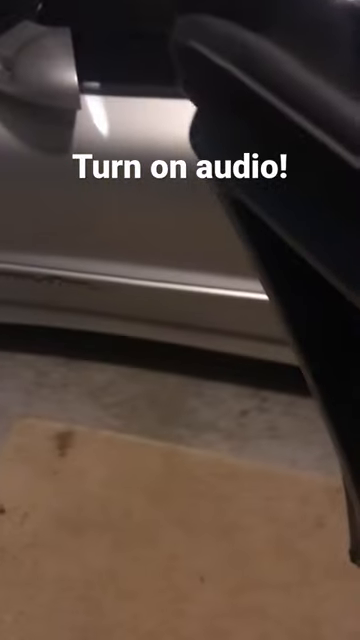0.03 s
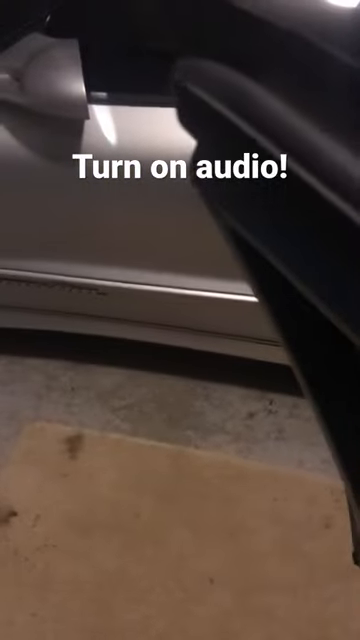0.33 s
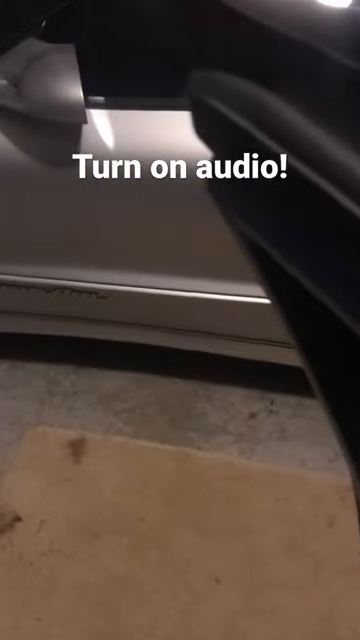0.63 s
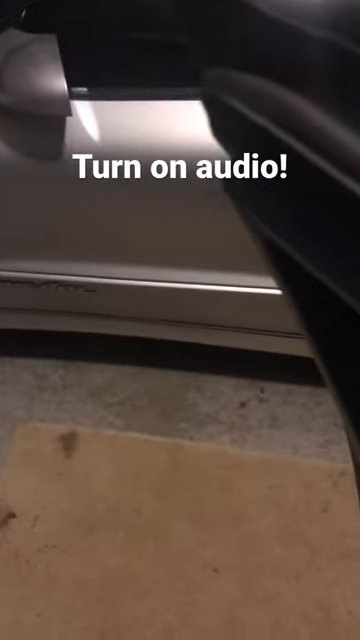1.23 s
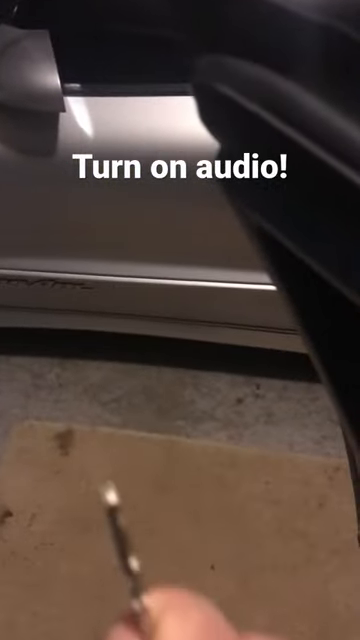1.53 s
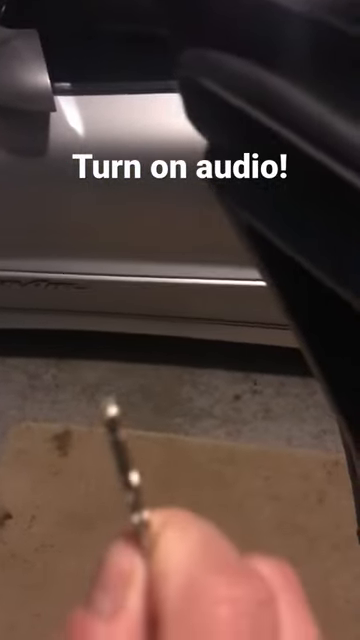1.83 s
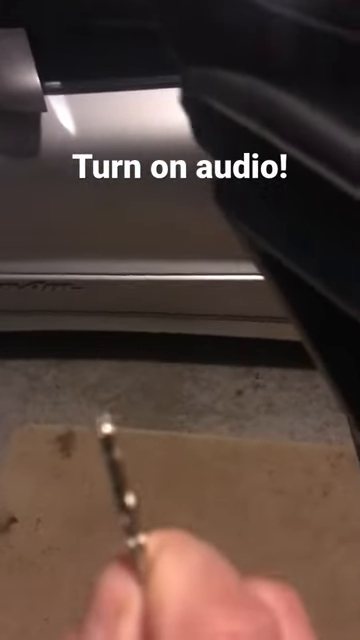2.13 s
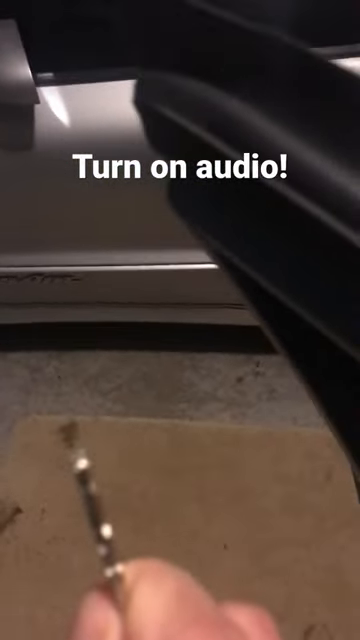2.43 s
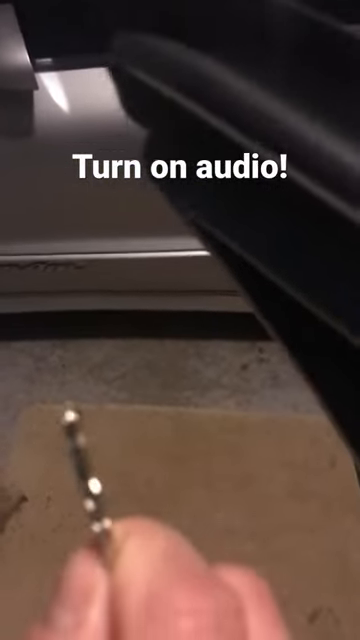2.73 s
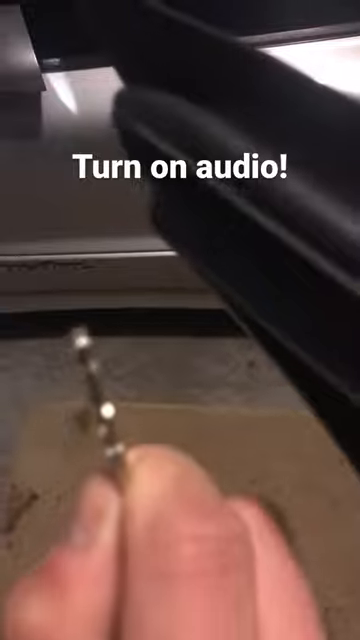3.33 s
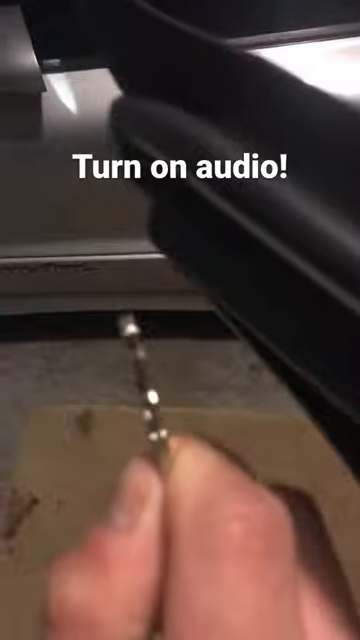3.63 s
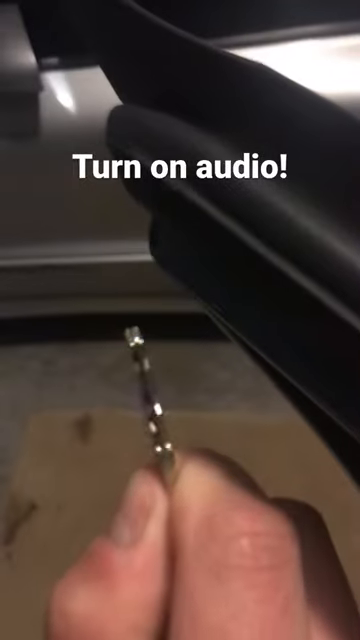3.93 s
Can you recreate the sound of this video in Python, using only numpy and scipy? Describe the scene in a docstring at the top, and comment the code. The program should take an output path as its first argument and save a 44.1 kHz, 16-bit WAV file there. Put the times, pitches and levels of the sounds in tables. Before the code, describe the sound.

Static electricity snaps sharply after faint handling noises, followed by a loud, thumping crack.

```python
"""A static spark snaps from a metal tip close to the microphone and leaves a raised hiss.
A second, louder crack overloads the microphone, which swings in a deep, falling thump.
The place is a quiet garage with a short echo. Before the spark, a hand shifts beside an open
car door: faint rustles, ticks and clinks, and one soft bump that rings the door panel."""
import sys
import numpy as np
from scipy import signal
from scipy.fft import rfft, irfft
from scipy.io import wavfile

SR = 44100
rng = np.random.default_rng(int(sys.argv[2]) if len(sys.argv) > 2 else 0)


def transcribe(signal):
    """Save signal, clipped to [-1, 1], as a 16-bit WAV file at the path in sys.argv[1]."""
    frames = np.atleast_2d(signal).T
    limited = np.clip(frames, -1, 1)
    pcm = np.round(limited * 32767).astype(np.int16)
    wavfile.write(sys.argv[1], SR, pcm)


N = 176400
SPARK_S = 3.5861


def amp(db):
    """Decibels to gain."""
    return 10 ** (np.asarray(db) / 20)


def unit(x):
    """Scale to rms 1."""
    return x / np.sqrt(np.mean(x ** 2) + 1e-20)


def since(s):
    """Seconds since s, zero before it."""
    return np.maximum(np.arange(N) / SR - s, 0)


def colour(points):
    """Gain against frequency from (Hz, dB) points."""
    f, db = np.transpose(points)
    return lambda hz: amp(np.interp(np.log(hz + 1), np.log(f + 1), db))


def band(centre_hz, octaves):
    """A bell-shaped gain on the octave scale."""
    return lambda hz: np.exp(-.5 * (np.log2((hz + 1) / centre_hz) / octaves) ** 2)


def bells(rows, hz):
    """The summed dB of (centre Hz, width Hz, dB) peaks and dips."""
    return sum(db / (1 + (2 * (hz - centre) / width) ** 2) for centre, width, db in rows)


def filtered(x, gain):
    """x through a gain of frequency."""
    return irfft(rfft(x, 2 * N) * gain(np.fft.rfftfreq(2 * N, 1 / SR)))[:N]


def noise(gain):
    """Coloured noise of rms 1."""
    white = rfft(rng.standard_normal(N))
    return unit(irfft(white * gain(np.fft.rfftfreq(N, 1 / SR)), N))


def decay(s, t60, attack_s):
    """A rise at s and an exponential fall of 60 dB in t60 seconds."""
    t = since(s)
    return (1 - np.exp(-t / attack_s)) * np.exp(-np.log(1000) * t / t60)


def ring(s, modes, attack_s):
    """Damped modes struck at s."""
    return sum(amp(db) * decay(s, t60, attack_s) * np.sin(2 * np.pi * hz * since(s))
               for hz, db, t60 in modes)


def pulse(gain, size=4096):
    """A minimum-phase click of peak 1 with the given colour."""
    cepstrum = irfft(np.log(gain(np.fft.rfftfreq(size, 1 / SR))))
    cepstrum[1:size // 2] *= 2
    cepstrum[size // 2 + 1:] = 0
    click = irfft(np.exp(rfft(cepstrum)))
    return click / np.abs(click).max()


def garage():
    """The garage's steady room tone, and the hiss that stays up after the spark."""
    # Spectra of room tone and hiss. Each row: frequency in Hz, relative level in dB.
    room_tone = [(13, -51), (22, -30), (40, -7.5), (64, -0.5), (115, -9), (180, -12.5), (300, -14),
                 (454, -18), (667, -19), (1220, -23), (3290, -28.5), (10500, -34.5), (12700, -34),
                 (15800, -35)]
    hiss_colour = [(59, -35), (100, 0), (307, -7), (349, -5.5), (659, -9), (800, -11.5), (2000, -14.5),
                   (3400, -11), (5800, -14.5), (9000, -17), (12700, -18), (15800, -22)]
    # The hiss creeps up. Each row: time in seconds, level in dB.
    hiss_level = [(3.59, -65.5), (3.7, -63), (3.92, -62)]
    s, db = np.transpose(hiss_level)
    hiss_gain = amp(np.interp(np.arange(N) / SR, s, db)) * (since(SPARK_S) > 0)
    return amp(-66) * noise(colour(room_tone)) + hiss_gain * noise(colour(hiss_colour))


def rustles():
    """Hand and cloth brush in soft swells of noise."""
    # Each row: crest, rise and fall in seconds, level in dB, centre in Hz, width in octaves.
    brushes = [(.2, 0.091, 0.18, -66, 83.5, 0.25), (1.12, 0.14, 0.073, -68, 2830, 0.99),
               (1.631, .025, 0.043, -62, 89, 0.87), (2.11, 0.076, 0.051, -61.5, 1280, 1.34),
               (2.128, 0.024, 0.035, -60.5, 282, 0.58), (2.27, 0.17, 0.18, -63.5, 149, 1.1),
               (2.27, 0.22, 0.14, -71.5, 8500, 0.81), (2.38, 0.23, 0.31, -66.5, 760, 1.84),
               (2.62, 0.09, .07, -71, 10800, 0.59), (2.68, 0.094, 0.079, -67, 4000, 0.93)]
    t, out = np.arange(N) / SR, np.zeros(N)
    for s, rise, fall, db, hz, octaves in brushes:
        swell = np.exp(-np.where(t < s, (s - t) / rise, (t - s) / fall))
        out += amp(db) * swell * noise(band(hz, octaves))
    return out


def handling():
    """The hand makes sharp little clicks, each with a noisy tail, and dull taps on the door."""
    # Each row: start in seconds, peak in dB, centre in Hz.
    clicks = [(0.4977, -50, 3900), (1.092, -50, 4500), (1.107, -53, 4500), (1.12, -51, 6000),
              (1.1418, -45.5, 2780), (1.15, -52, 8000), (1.419, -50.5, 3400), (1.5288, -52.5, 3700)]
    # Each row: start in seconds, level in dB, centre in Hz, t60 in seconds.
    taps = [(2.475, -53.5, 975, 0.027), (2.593, -47, 1240, .012), (2.610, -49, 1400, 0.021),
            (2.6233, -47.5, 1300, .024)]
    out = np.zeros(N)
    for s, db, hz in clicks:
        tone = band(hz, octaves=.85)
        snap = pulse(lambda f: tone(f) + .012)
        out[round(s * SR):][:len(snap)] += amp(db) * snap
        out += amp(db - 10) * decay(s, t60=.012, attack_s=.00024) * noise(tone)
    for s, db, hz, t60 in taps:
        out += amp(db) * decay(s, t60, attack_s=.00042) * noise(band(hz, octaves=.57))
    return out


def clinks():
    """Light metal ticks on contact and rings in a few high modes."""
    # Each row: start in seconds, level in dB, brightness in dB per octave.
    strikes = [(.079, -66.5, -6), (.154, -74, 9), (.72, -72.5, 8)]
    # The metal's modes. Each row: frequency in Hz, relative level in dB, t60 in seconds.
    metal = [(6740, -2.5, .52), (10850, -10, .16), (14305, -1, .12), (15355, -11, .16)]
    out = np.zeros(N)
    for s, db, tilt in strikes:
        modes = [(hz, level + tilt * np.log2(hz / metal[0][0]), t60) for hz, level, t60 in metal]
        contact = amp(14) * decay(s, t60=.012, attack_s=.00045) * noise(band(14500, octaves=.81))
        out += amp(db) * (ring(s, modes, attack_s=.00077) + contact)
    return out


def door_bump(start_s=2.6272):
    """A soft blow on the car door, whose panel rings low and rumbles on."""
    # Spectra of blow and rumble. Each row: frequency in Hz, relative level in dB.
    blow_colour = [(35, -35), (60, -2), (290, -0.5), (559, -11), (932, 1.5), (1500, -12), (2200, -19),
                   (2760, -25), (6390, -23), (8000, -34), (10400, -60), (17600, -120)]
    panel_colour = [(15, -40), (25, -13), (55, 1), (81, -15), (133, -10.5), (160, -14), (271, -10),
                    (504, -23.5), (850, -15.5), (1950, -29), (6000, -41.5), (7800, -66), (13200, -120)]
    # Each row: frequency in Hz, level in dB, t60 in seconds.
    panel_modes = [(53.3, -51.5, 0.75), (228.4, -48.5, 0.333), (272, -43, 0.094), (683, -56.5, .14),
                   (917, -38, 0.026), (1353, -50, .06)]
    blow = amp(-37) * decay(start_s, t60=.031, attack_s=.001) * noise(colour(blow_colour))
    rumble = amp(-49.5) * decay(start_s, t60=.75, attack_s=.0089) * noise(colour(panel_colour))
    return blow + rumble + ring(start_s, panel_modes, attack_s=.0018)


def flutter(crack_s, lead_s=.018):
    """Low tones and a rush of noise swell in just ahead of the crack and stop on it."""
    # Each row: frequency in Hz, level at the crack in dB, growth in dB per second.
    partials = [(394, -16, 800), (497, -13.5, 2198), (240, -23, 2200), (3130, -34.5, 1100)]
    ahead = np.maximum(crack_s - np.arange(N) / SR, 0)
    tones = sum(amp(db - growth * ahead) * np.sin(2 * np.pi * hz * ahead) for hz, db, growth in partials)
    rush = amp(-27 - 1500 * ahead) * noise(band(445, octaves=.92))
    return (ahead > 0) * (tones + rush) / (1 + (ahead / lead_s) ** 8)


def microphone_thump(start_s):
    """The overloaded microphone swings, sinking in pitch, rough at the height of the swing."""
    floor_hz, drop_hz, sag_s = 28, 1500, .00045
    attack_s, hold_s, t60 = .0015, .0172, .062
    t = since(start_s)
    pitch = (floor_hz + drop_hz * (1 + t / sag_s) ** -1.13) * (t > 0)
    swing = (1 - np.exp(-t / attack_s)) * np.exp(-np.log(1000) * since(start_s + hold_s) / t60)
    thump = amp(-.5) * swing * np.sin(2 * np.pi * np.cumsum(pitch) / SR)
    rattle = amp(-30) * swing ** 2 * noise(band(480, octaves=.55))
    return thump + rattle


def loud_crack():
    """Two ticks and a flutter lead into a hard crack; the microphone thumps and the garage echoes."""
    # Two ticks, then the crack. Each row: start in seconds, peak in dB before clipping.
    hits = [(3.9255, -23), (3.937, -29), (3.9484, 2.5)]
    # Spectra of crack and echo. Each row: frequency in Hz, relative level in dB.
    crack_colour = [(100, -38), (550, 6.5), (750, -1.5), (1000, 4), (2000, -2), (3800, -3.5), (4900, -6.5),
                    (6200, -6), (8800, -13.5), (9800, -30), (12500, -18.5), (16000, -33)]
    echo_colour = [(1000, -15), (4800, -6.5), (6400, -1.5), (9000, -1.5), (10400, -1), (11200, 2),
                   (13000, 0.5), (15700, -1)]
    impulses = np.zeros(N)
    for s, db in hits:
        impulses[round(s * SR)] -= amp(db)
    cracks = signal.fftconvolve(impulses, pulse(colour(crack_colour)))[:N]
    crack_s = hits[-1][0]
    echo = amp(-38) * decay(crack_s, t60=.3, attack_s=.0039) * noise(colour(echo_colour))
    return cracks - flutter(crack_s) + microphone_thump(crack_s) + echo


def gap_colour(points, share):
    """A colour shaped by a share of the resonances of metal and microphone near the spark gap."""
    # Resonances and a null. Each row: centre in Hz, width in Hz, lift in dB at full share.
    resonances = [(5630, 360, 9), (6540, 320, 8), (7800, 300, 4), (8840, 520, 11.5), (9470, 490, 12),
                  (11000, 440, 3), (12600, 700, 6.5), (13820, 350, 8), (14400, 300, -9), (15150, 500, 8)]
    return lambda hz: colour(points)(hz) * amp(share * bells(resonances, hz))


def spark(hold_s=.0011, scatter_s=.0032):
    """A millisecond shock and weaker scatter off hand and door ring nearby metal; the garage echoes."""
    # Spectra of shock and echo. Each row: frequency in Hz, relative level in dB.
    shock_colour = [(100, -18), (500, -12), (900, -23.5), (1150, -9), (1800, -7.5), (2250, -14.5),
                    (2650, -30), (3000, -10.5), (3700, -7), (5000, -11.5), (8200, -8), (10000, -8),
                    (11200, -2.5), (14400, -7), (16000, -5)]
    echo_colour = [(300, -10), (1400, 0.5), (2600, -5), (3800, -1), (4800, -7), (5700, -2.5), (6500, -7),
                   (8000, -6), (10200, -6), (11200, 2), (13000, -2), (15500, 4)]
    # First reflections. Each row: delay in seconds, level in dB against the direct sound.
    walls = [(.0093, -33), (0.024, -33.5)]
    t = since(SPARK_S)
    shape = (t > 0) * np.where(t < hold_s, 1, amp(-8) * (t < scatter_s))
    burst = shape * rng.standard_normal(N)
    burst[np.argmax(t > 0)] += amp(13)  # the shock front stands above what follows
    for _ in range(4):  # a shock carries all frequencies evenly
        spectrum = rfft(burst)
        burst = irfft(spectrum / (np.abs(spectrum) + 1e-12), N) * np.sqrt(shape)
    ringing = signal.fftconvolve(burst, pulse(gap_colour(shock_colour, share=1)))[:N]
    shock = unit(ringing) * np.sqrt(np.mean(shape ** 2))
    reflections = sum(amp(db) * np.roll(shock, round(delay * SR)) for delay, db in walls)
    echo = amp(-47) * decay(SPARK_S, t60=.29, attack_s=.0022) * noise(gap_colour(echo_colour, share=.85))
    return amp(-15) * (shock + reflections) + echo


def scene():
    """The garage from one microphone, close to the metal tip."""
    return (garage() + rustles() + handling() + clinks() + door_bump() + spark() + loud_crack())[None]


def record(dry):
    """The microphone clips at its ceiling, dulls two narrow bands and cuts the highest treble."""
    # Each row: centre in Hz, width in Hz, gain in dB.
    dips = [(4900, 320, -3), (10370, 710, -3)]
    ceiling, top_hz = .95, 15950
    clipped = np.clip(dry[0], -ceiling, ceiling)
    dulled = filtered(clipped, lambda hz: amp(bells(dips, hz)))
    return filtered(dulled, lambda hz: 1 / (1 + (hz / top_hz) ** 160))[None]


dry = scene()
out = record(dry)
transcribe(out)
```